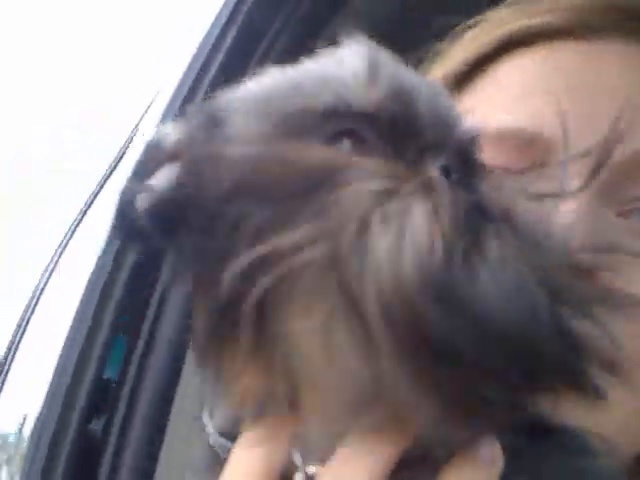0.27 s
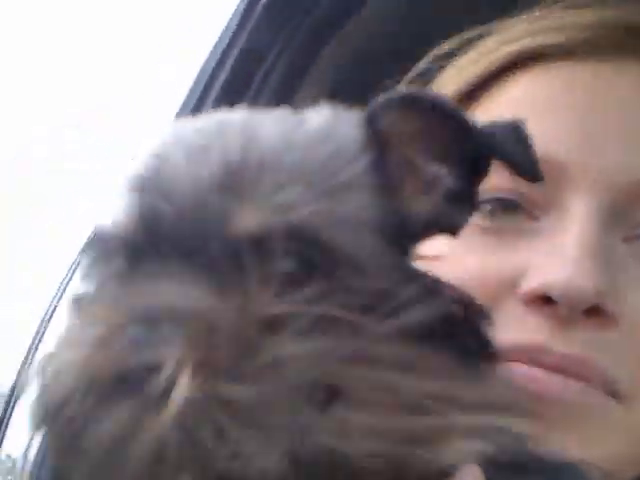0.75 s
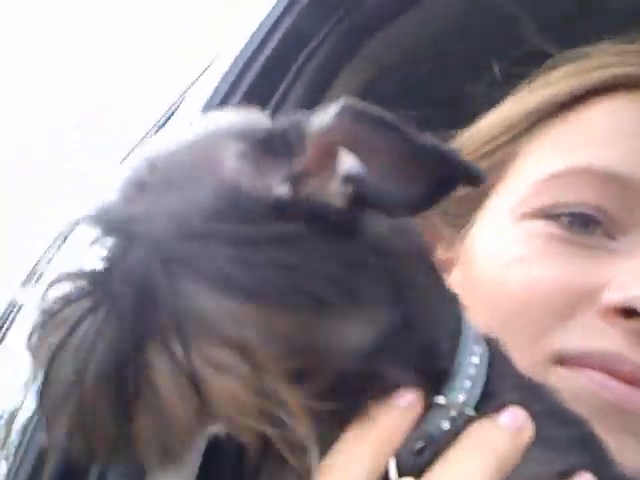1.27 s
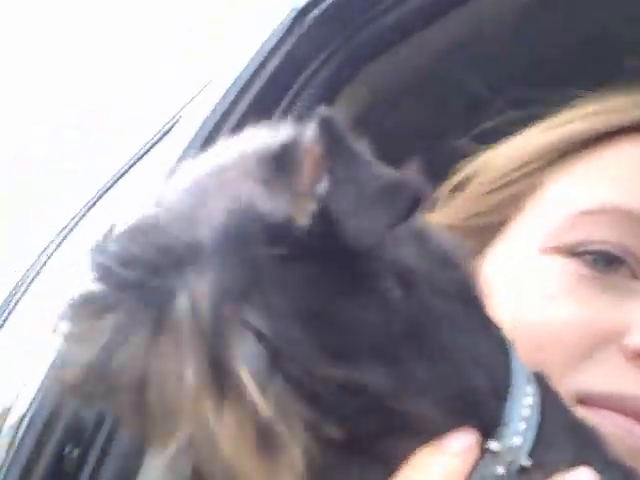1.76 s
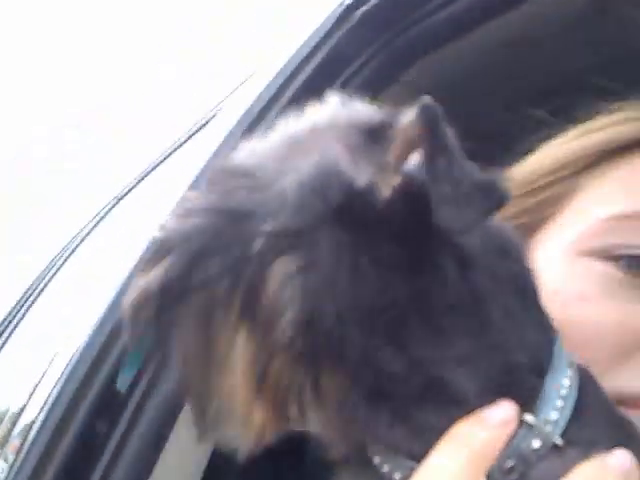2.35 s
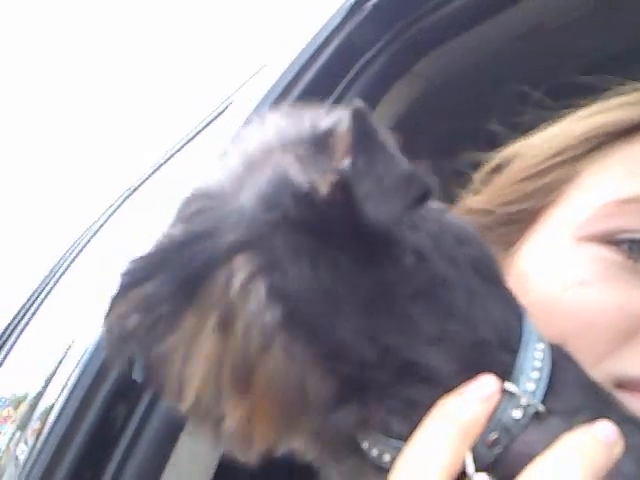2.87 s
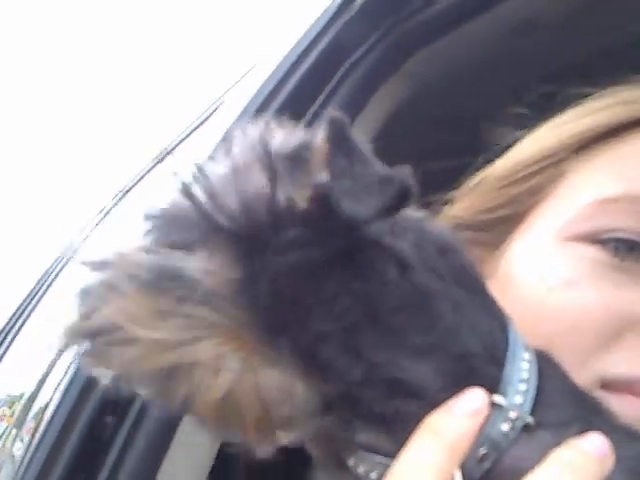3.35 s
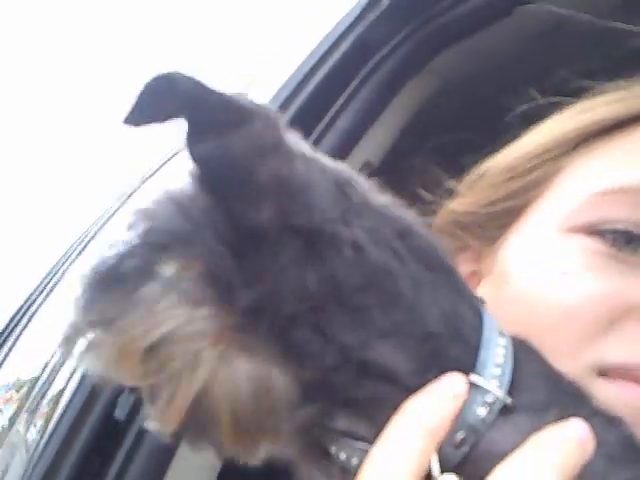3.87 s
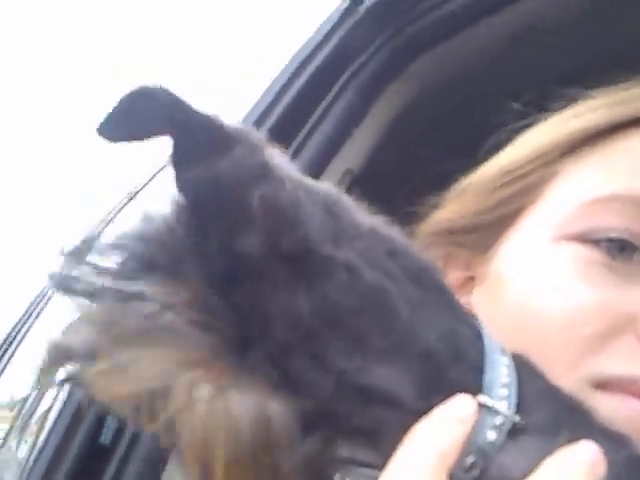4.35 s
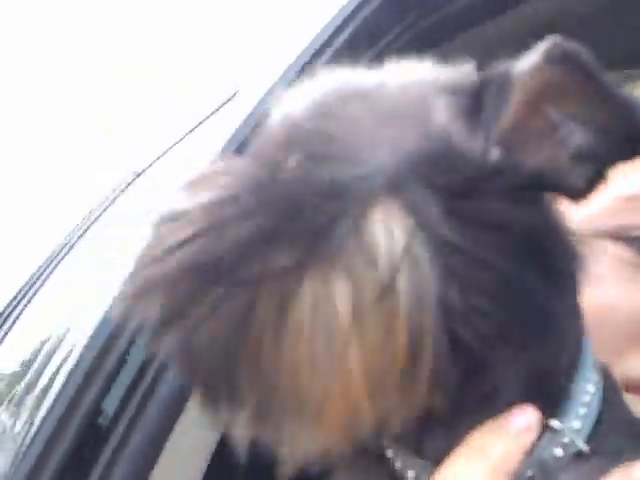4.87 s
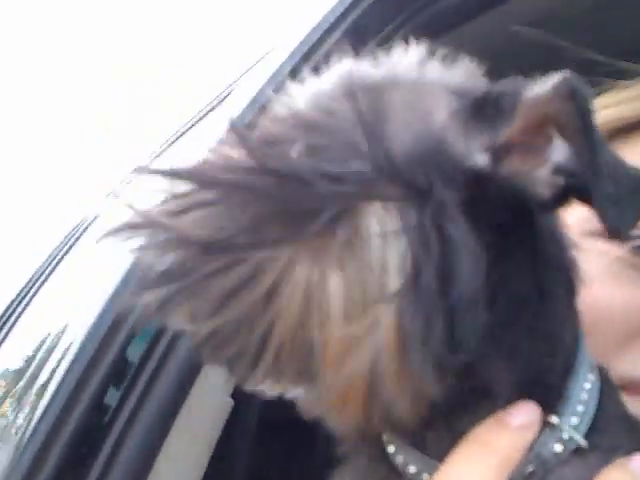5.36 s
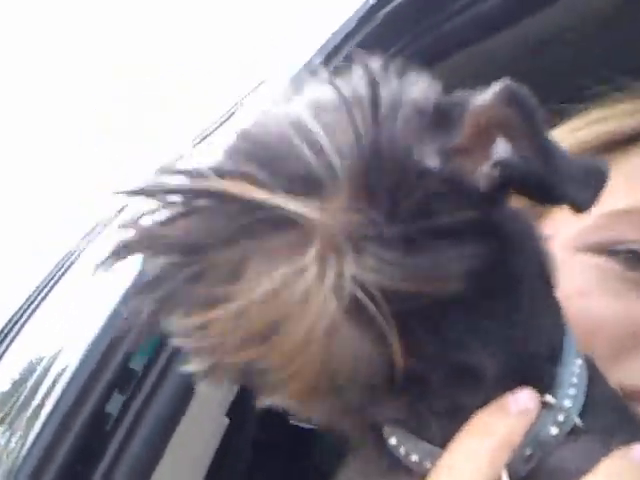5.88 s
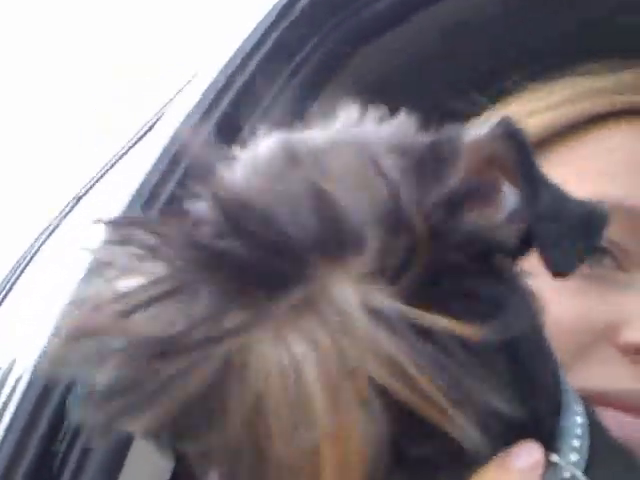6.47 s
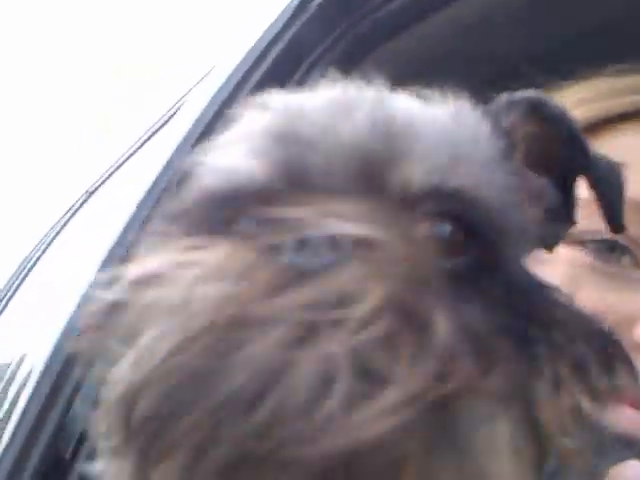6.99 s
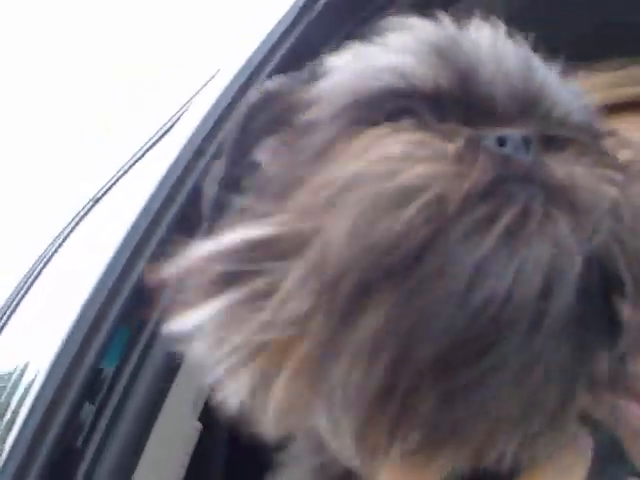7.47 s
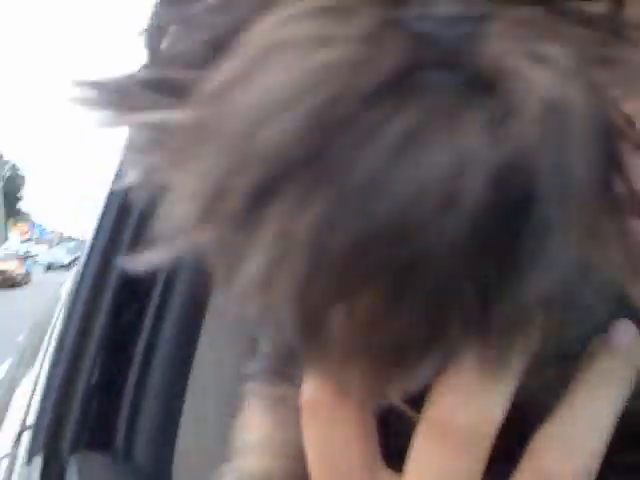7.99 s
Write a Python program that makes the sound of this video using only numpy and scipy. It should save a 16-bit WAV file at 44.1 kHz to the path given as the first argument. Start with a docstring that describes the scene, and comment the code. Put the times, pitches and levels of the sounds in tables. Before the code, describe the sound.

A small microphone sits right by the open window of a moving car. From 0 s, strong wind overloads it with deep uneven buffeting: low thuds, mid thumps, fluttering gusts and sharp slaps with short sprays of hiss. Behind is a steady cabin rush of tyre roar and passing air, with fine hiss and a very faint thin whistle high above. Between about 0.7 and 1.6 s a soft band of rush glides upward, perhaps passing traffic. Slaps crowd together around 2.3-2.6 s, the hardest near 2.5 s. From 3.6 s faint damped metallic engine ticks begin under the wind, roughly a dozen a second. After 4.5 s the wind and road rush ease, with a marked lull near 5.8 s and renewed thumps around 6 s. From 6.6 to 8.2 s only scattered weaker bumps remain, and the slightly slower ticks stand clear over softer rush; the whistle lifts slightly near 7.9 s.

```python
"""A small microphone is held by the open window of a car that slows down.
From the start eddies buffet and slap its port with lumpy low noise, tyre and air rush fill the cabin,
and a thin whistle of narrow resonant noise sits high above; about a second in, a band of rush sweeps upward.
From 3.6 s the engine ticks faintly, damped metal set ringing by rattling contacts; the ticks come
slower and clearer as the wind eases and the car loses speed."""
import sys
import numpy as np
from scipy import signal
from scipy.fft import rfft, irfft, next_fast_len
from scipy.io import wavfile
from scipy.ndimage import uniform_filter1d

SR = 44100
rng = np.random.default_rng(int(sys.argv[2]) if len(sys.argv) > 2 else 0)


def transcribe(u):
    """Save the signal u as a 16-bit wav file named by the first command-line argument.

    u: samples, shape (n,) or (channels, n), limited to [-1, 1]; the rate is SR.
    q: integer samples, one column per channel.
    """
    v = np.clip(np.atleast_2d(u).T, -1, 1)
    q = np.round(v * 32767).astype(np.int16)
    wavfile.write(sys.argv[1], SR, q)


N = 362941  # samples

# Spectrum shapes below are relative: each noise is scaled to unit rms before its level is set.
# large eddies at the port: (frequency [Hz], density [dB per Hz])
LARGE_EDDIES = [(12, -31), (22, -0.5), (40, 2), (60, -2), (90, -11.5), (200, -47.5)]
# middling eddies at the port: (frequency [Hz], density [dB per Hz])
MIDDLING_EDDIES = [(40, -18.5), (72, 2), (110, -1), (150, -5.5), (220, -27), (400, -54)]
# small eddies at the port: (frequency [Hz], density [dB per Hz])
SMALL_EDDIES = [(90, -16), (170, -1.5), (250, -4), (400, -10), (600, -16.5), (1200, -25), (3000, -49.5),
                (6000, -86.5)]
# wind on the port between buffets:
# (time [s], large eddies [dB], middling eddies [dB], small eddies [dB])
WIND = [(0, -23, -27, -31), (.3, -24, -27, -31), (.62, -28, -28, -33), (1.15, -28.5, -30.5, -35),
        (1.45, -25, -30.5, -34), (1.72, -23, -29, -35), (1.83, -29, -34, -39), (1.95, -24, -30, -35),
        (2.3, -22.5, -27.5, -31), (2.58, -24, -28, -32), (2.66, -31, -33, -37), (2.77, -28, -33, -36),
        (2.86, -23.5, -33, -37), (3.1, -23, -25, -32.5), (3.6, -24, -27, -33.5), (4.45, -27, -32, -37.5),
        (4.7, -26, -29, -37), (5.3, -27.5, -30, -36), (5.48, -30.5, -31.5, -40), (5.7, -31, -35, -42),
        (5.79, -38, -43, -44), (5.93, -37, -41, -43), (6.0, -28, -31, -40), (6.25, -28, -31, -40),
        (6.7, -32, -38, -41.5), (7.2, -37, -44.5, -46), (7.7, -35.5, -42.5, -44.5), (8.05, -37, -45, -46),
        (8.23, -40, -50, -46.5)]
# buffets, swells of the wind:
# (start [s], length [s], large eddies [dB], middling eddies [dB], small eddies [dB])
BUFFETS = [(0.046, 0.065, -14.5, -30, -25.5), (0.137, 0.077, -25, -23.5, -43), (0.268, 0.07, -18, -25, -27),
           (0.352, 0.085, -18, -20.5, -29), (0.473, 0.1, -18.5, -35.5, -33),
           (0.675, 0.034, -18, -16, -26.5), (0.755, 0.05, -15.5, -25, -44), (0.834, 0.016, -10, -18, -26),
           (1.009, 0.056, -18.5, -39, -31), (1.179, 0.025, -25, -21.5, -40),
           (1.299, 0.076, -20.5, -20, -27), (1.466, 0.082, -18, -16.5, -28), (1.552, 0.096, -14, -25, -26),
           (1.638, 0.066, -17.5, -23.5, -32), (1.758, 0.042, -22, -24, -38),
           (1.862, 0.047, -14.5, -23.5, -28.5), (1.925, 0.091, -28, -25, -28.5),
           (2.028, 0.097, -21, -21.5, -27), (2.213, 0.069, -14.5, -35.5, -32.5),
           (2.26, 0.11, -18.5, -41, -25.5), (2.354, 0.077, -17, -35, -30.5),
           (2.469, 0.048, -27.5, -22, -25.5), (2.529, 0.034, -12, -21, -28.5),
           (2.568, 0.033, -18, -20, -29), (2.724, 0.042, -16, -20, -37), (2.92, 0.082, -15, -22, -29),
           (3.046, 0.049, -27, -24, -41), (3.203, 0.042, -17, -27, -28), (3.258, 0.08, -19.5, -22.5, -30),
           (3.373, 0.026, -27, -19, -48), (3.497, 0.031, -19, -28, -39), (3.602, 0.047, -20, -21, -35),
           (3.772, 0.055, -18.5, -35, -30), (3.969, 0.07, -21.5, -25, -30), (4.064, 0.05, -16, -39, -31.5),
           (4.156, 0.099, -22, -30.5, -38), (4.289, 0.086, -24.5, -27.5, -43),
           (4.504, 0.028, -21, -18.5, -46), (4.63, 0.11, -21.5, -32, -38), (4.804, 0.054, -24.5, -33, -37),
           (4.925, 0.063, -27, -18, -37), (5.07, 0.094, -23.5, -36, -38.5), (5.254, 0.037, -23, -29, -31),
           (5.29, 0.052, -20.5, -24, -31), (5.514, 0.025, -16.5, -19, -31.5), (5.612, 0.064, -22, -35, -42),
           (5.839, 0.053, -29.5, -33, -44), (5.957, 0.032, -22.5, -33, -37),
           (6.018, 0.041, -23, -20.5, -35), (6.065, 0.085, -20.5, -26.5, -39.5),
           (6.21, 0.07, -30, -28, -37.5), (6.298, 0.035, -23, -34, -45), (6.375, 0.023, -21, -33, -32.5),
           (6.48, 0.16, -32, -52, -41), (6.685, 0.057, -26, -40, -52), (6.772, 0.13, -32, -35.5, -46),
           (6.949, 0.06, -19, -33.5, -34), (7.006, 0.11, -37, -31.5, -51), (7.286, 0.062, -23, -57, -55),
           (7.626, 0.029, -23.5, -42, -35.5), (7.82, 0.11, -28.5, -38, -41.5)]
BUFFET_RISE_S, BUFFET_FADE_S = 0.041, 0.054  # a buffet swells quickly and fades more slowly

# level of the cabin body in the road and air rush: (time [s], level [dB])
RUSH_LEVEL = [(0.03, -34), (.4, -33), (.87, -34.5), (1.63, -34), (2.0, -35.5), (2.31, -36), (2.7, -36.5),
              (3.6, -37.5), (4.5, -39), (4.7, -40), (5.7, -41.5), (6.05, -40), (6.56, -43.5), (7.1, -44.5),
              (7.7, -41.5), (8.2, -42)]
# car speed shows in the mix, each level over the body:
# (time [s], treble [dB], air hiss [dB], tyre hum [dB])
SPEED_MIX = [(0, -16, -7.5, -2), (.8, -12.5, -10, -6), (2.2, -10, -8, -8.5), (3.3, -11, -11.5, -10),
             (4.5, -13, -15.5, -8.5), (6.0, -13, -16, -9), (7.1, -13, -23, -5.5), (8.2, -13, -14, -8)]
# tyre roar coloured by the cabin: (frequency [Hz], density [dB per Hz])
CABIN_BODY = [(60, -10), (200, -2.5), (450, -1), (700, -6.5), (900, -5.5), (1100, -2), (1500, -4),
              (1750, -8), (2000, -22.5), (2600, -38.5)]
# treble of the cabin rush: (frequency [Hz], density [dB per Hz])
CABIN_TREBLE = [(1700, -24.5), (2100, -5), (2350, 0.5), (2600, -1), (2800, -6), (3300, -9), (3900, -15.5),
                (4500, -31), (5600, -33), (6500, -37), (8000, -45.5), (9500, -57.5), (13000, -68.5)]
# smooth hiss of passing air: (frequency [Hz], density [dB per Hz])
AIR_HISS = [(1200, -17.5), (1600, -2.5), (2000, -0.5), (2400, -7), (3500, -22.5), (5000, -32),
            (7500, -56.5)]
# hum band of the tyres: (frequency [Hz], density [dB per Hz])
TYRE_HUM = [(740, -12.5), (820, -3.5), (900, -1), (980, -5.5), (1100, -25)]

# fine hiss of air sheared at the window edge: (frequency [Hz], density [dB per Hz])
TOP_HISS = [(4000, -18.5), (4800, 3), (6000, -1.5), (7000, -11.5), (8500, -24), (10500, -32.5)]
# level of the top hiss, strongest early at full speed: (time [s], level [dB])
TOP_HISS_LEVEL = [(0, -69), (.4, -69.5), (.8, -70.5), (1.5, -73.5), (2.2, -76), (2.7, -81.5), (3.6, -80.5),
                  (6.2, -87), (8.2, -82)]

# mean level of the high whistle: (time [s], level [dB])
WHISTLE_LEVEL = [(0, -84), (3.4, -88.5), (4.8, -92), (6.0, -94.5), (6.95, -92), (7.1, -88), (7.35, -86),
                 (7.75, -86), (7.86, -81), (7.96, -83), (8.03, -88), (8.2, -83)]
WHISTLE_HZ, WHISTLE_WIDTH_HZ = 6950, 240  # width of one pass through the resonance

# broad roar of strong buffets: (frequency [Hz], density [dB per Hz])
GUST_ROAR = [(350, -9.5), (600, -2), (1200, -2), (2500, -9), (4000, -24), (6000, -43), (9500, -66.5)]
# roar level when the small eddies of a buffet reach the given level; dB of roar for each dB more
ROAR_DB, ROAR_AT_DB, ROAR_GROWTH = -40.5, -28.5, 1.2

# sharp eddies slapping the port; the last column is a reference for both spray and crack:
# (time [s], thud peak before its low-pass [dB], treble reference [dB])
SLAPS = [(0.062, -8, -48), (0.284, -21, -51), (0.456, -8.5, -49), (0.508, -7.5, -60), (0.779, -16, -64),
         (0.9, -12, -63), (1.359, -18, -58), (1.439, -10.5, -72), (1.527, -28, -51), (1.598, -29, -56),
         (1.868, -11, -52), (2.019, -10.5, -57), (2.254, -19, -52), (2.268, -24, -55), (2.282, -18, -48.5),
         (2.297, -20, -49), (2.323, -10, -55), (2.357, -8.5, -51), (2.383, -20.5, -54), (2.474, -4, -52),
         (2.485, -11, -67), (2.499, -13, -61), (2.532, -2.5, -41), (2.567, -14.5, -54), (2.745, -17, -62),
         (2.95, -16, -61), (3.074, -17, -53), (3.302, -10, -53), (3.345, -22, -52), (3.374, -22, -60),
         (3.4, -26, -65), (3.753, -10.5, -69.5), (3.987, -13.5, -54), (4.095, -29, -58), (4.291, -9.5, -56),
         (4.598, -11, -64), (4.944, -17, -62), (5.07, -11, -71), (5.261, -21, -61), (5.309, -17, -57.5),
         (5.368, -11, -76), (5.513, -14, -59), (5.836, -19, -61), (5.965, -15.5, -64), (6.014, -19, -54),
         (6.199, -15, -61), (6.372, -19, -67), (6.679, -30, -64), (6.944, -19, -71), (7.023, -18, -72),
         (7.627, -27, -68), (7.861, -19, -58)]
# low thud of a slap: (frequency [Hz], density [dB per Hz])
SLAP_THUD = [(40, -21.5), (100, 0.5), (200, -8), (450, -23), (1000, -38.5), (2000, -48.5)]
# hissing spray of a slap: (frequency [Hz], density [dB per Hz])
SLAP_SPRAY = [(500, 17), (1500, 19.5), (3500, 5.5), (5000, -6), (7000, -26.5), (9000, -43.5)]

# a band of rush sweeps upward, perhaps passing traffic: (time [s], centre [Hz], level [dB])
SWEEP = [(.7, 1270, -54), (.95, 1397, -43.5), (1.2, 1523, -43.5), (1.4, 1685, -49), (1.6, 1720, -63)]
SWEEP_WIDTH_HZ = 190

# engine running down, one tick a turn: (time [s], turns so far [count])
TURNS = [(3.645, 0), (4.395, 10), (4.86, 16), (5.41, 23), (5.9, 29), (6.152, 32), (6.589, 37), (7.025, 42),
         (7.468, 47), (7.915, 52), (8.19, 55)]
# tick strength before the softening filter: (time [s], bright peak [dB], dull knock peak [dB])
TICK_LEVEL = [(3.65, -69.5, -36), (4.5, -64.5, -40.5), (5.3, -74, -41), (6.099, -61.5, -38),
              (6.4, -72, -52.5), (7.0, -63, -44), (8.2, -58.5, -40)]
# ticks that stand clear once the wind has eased, before the softening filter:
# (time [s], bright peak [dB], dull knock peak [dB])
CLEAR_TICKS = [(6.592, -63, -44), (6.68, -65, -43), (6.76, -67, -42), (6.848, -60, -41), (6.939, -63, -43),
               (7.024, -66, -44), (7.117, -66, -52), (7.203, -66, -44), (7.292, -60, -45),
               (7.382, -66, -43), (7.471, -61, -36), (7.566, -61, -40), (7.652, -63, -56),
               (7.741, -60, -41), (7.828, -60, -37), (7.919, -58, -41), (8.011, -60, -39),
               (8.103, -60, -42), (8.192, -57, -36.5)]
# metal modes of the dull knock, relative levels: (frequency [Hz], level [dB], 60 dB decay [s])
TICK_DULL = [(2486, 2, 0.0072), (2950, -2.5, 0.0036), (3500, -14.5, 0.0036)]
# metal modes of the bright tick, relative levels: (frequency [Hz], level [dB], 60 dB decay [s])
TICK_BRIGHT = [(4700, -4, 0.003), (5200, -1, 0.004), (5600, -1, 0.004), (6200, -6, 0.003)]
TICK_SPREAD_DB, TICK_JITTER_S = 1.6, 0.002  # standard deviations from tick to tick
RATTLE_UNDER_TICKS_DB = -8  # a steady rattle fills the gaps between ticks

CUTOFF_HZ = 12400  # stop-band edge of the microphone


def from_db(db):
    """Decibels to gain."""
    return 10 ** (np.asarray(db) / 20)


def rms_one(x):
    """Scale to unit rms."""
    return x / np.sqrt(np.mean(x ** 2) + 1e-20)


def in_time(rows):
    """Table columns as curves, one value a sample, held flat beyond the ends."""
    s, *columns = np.transpose(rows)
    t = np.arange(N) / SR
    return [np.interp(t, s, column) for column in columns]


def drift(rate_hz):
    """Slow chance: noise at every 40th sample through a double one-pole low-pass, at unit rms."""
    r = np.exp(-80 * np.pi * rate_hz / SR)
    coarse = rng.standard_normal(N // 40 + 2002)
    slow = signal.lfilter([1], [1, -2 * r, r * r], coarse)[2000:]  # skip the filter's settling
    return np.interp(np.arange(N) / 40, np.arange(len(slow)), rms_one(slow))


def turbulence(spectrum, lump_db, lump_hz, own_db):
    """Coloured noise in overlapping octave bands; lumps swell all bands, each band also flickers alone."""
    size = next_fast_len(N)
    hz = np.arange(1, size // 2 + 2) * SR / size
    point_hz, point_db = np.transpose(spectrum)
    colour_db = np.interp(np.log(hz), np.log(point_hz), point_db, left=-150, right=-150)
    noise = from_db(colour_db) * rfft(rng.standard_normal(size))
    lumps = lump_db * drift(lump_hz)
    lowest, highest = int(np.log2(point_hz[0])), int(np.log2(point_hz[-1])) + 1
    out = 0
    for octave in range(lowest, highest + 1):
        window = np.cos(np.pi / 2 * np.clip(np.log2(hz) - octave, -1, 1)) ** 2
        band = irfft(noise * window, size)[:N]
        out = out + from_db(lumps + own_db * drift(lump_hz)) * band
    return rms_one(out)


def evened(x, evenness, span_s):
    """Eddies follow one another at a fairly even strength: swings slower than the span are flattened."""
    span = max(round(span_s * SR), 1)
    power = uniform_filter1d(uniform_filter1d(x ** 2, span), span)
    strength = np.sqrt(np.abs(power) + 0.018)  # the floor spares the quietest moments
    return rms_one(x / strength ** evenness)


def bursts(times, levels_db, rise_s, fall_s):
    """An envelope with one quick rise and exponential fall for each event."""
    marks = np.zeros(N)
    marks[np.round(np.asarray(times) * SR).astype(int)] = from_db(levels_db)
    t = np.arange(SR // 10) / SR
    shape = (1 - np.exp(-t / rise_s)) ** 2 * np.exp(-t / fall_s)
    return signal.fftconvolve(marks, shape / shape.max())[:N]


def buffets(levels_db):
    """Envelope of the buffets: each holds for its length with soft edges, the strongest winning."""
    start, length = np.transpose(BUFFETS)[:2]
    t, out = np.arange(N) / SR, np.zeros(N)
    for s, d, gain in zip(start, length, from_db(levels_db)):
        rise, fade = (t - s) / BUFFET_RISE_S, (s + d - t) / BUFFET_FADE_S
        inside = np.clip(np.minimum(rise, fade) + 0.5, 0, 1)
        out = np.maximum(out, gain * np.sin(np.pi / 2 * inside) ** 2)
    return out


def buffeting():
    """Large eddies thud at the port, middling ones thump, small ones flutter on top."""
    large = turbulence(LARGE_EDDIES, lump_db=-1.5, lump_hz=12.0, own_db=1.9)
    middling = turbulence(MIDDLING_EDDIES, lump_db=3.5, lump_hz=22.0, own_db=1.5)
    small = turbulence(SMALL_EDDIES, lump_db=2.5, lump_hz=23.0, own_db=0.5)
    eddies = (evened(large, evenness=0.64, span_s=0.034),
              evened(middling, evenness=0.74, span_s=0.058),
              evened(small, evenness=0.54, span_s=0.037))
    out = 0
    for wind_db, buffet_db, noise in zip(in_time(WIND), np.transpose(BUFFETS)[2:], eddies):
        out = out + np.hypot(from_db(wind_db), buffets(buffet_db)) * noise  # powers add
    return out


def rush():
    """Tyre roar coloured by the cabin; at speed a smooth air hiss fills the dip between its resonances."""
    level_db, = in_time(RUSH_LEVEL)
    treble_db, hiss_db, hum_db = in_time(SPEED_MIX)
    body = turbulence(CABIN_BODY, lump_db=0.86, lump_hz=19.0, own_db=-0.46)
    treble = turbulence(CABIN_TREBLE, lump_db=1.5, lump_hz=6.5, own_db=-0.9)
    hiss = turbulence(AIR_HISS, lump_db=1.0, lump_hz=5.5, own_db=1.0)
    hum = turbulence(TYRE_HUM, lump_db=1.0, lump_hz=19.0, own_db=0.5)
    flutter_db = 0.48 * drift(28.0)  # the open window lets the whole rush swell together
    layers = body + from_db(treble_db) * treble + from_db(hiss_db) * hiss + from_db(hum_db) * hum
    return from_db(level_db + flutter_db) * layers


def top_hiss():
    """Fine hiss of air sheared at the window edge."""
    level_db, = in_time(TOP_HISS_LEVEL)
    return from_db(level_db) * turbulence(TOP_HISS, lump_db=1.5, lump_hz=10.0, own_db=1.5)


def whistle():
    """Noise twice through one narrow resonance, wavering in level."""
    b, a = signal.iirpeak(WHISTLE_HZ, WHISTLE_HZ / WHISTLE_WIDTH_HZ, fs=SR)
    once = signal.lfilter(b, a, rng.standard_normal(N))
    tone = rms_one(signal.lfilter(b, a, once))
    level_db, = in_time(WHISTLE_LEVEL)
    return from_db(level_db + 1.5 * drift(25.0)) * tone


def roar():
    """Strong buffets tear past the port with a broad roar that grows faster than they do."""
    small_db = np.transpose(BUFFETS)[4]
    small = buffets(small_db) / from_db(ROAR_AT_DB)
    noise = turbulence(GUST_ROAR, lump_db=1.8, lump_hz=30.0, own_db=0.6)
    return from_db(ROAR_DB) * small ** ROAR_GROWTH * noise


def slaps(crest_db=9.5, spray_over_treble_db=12.0, crack_over_treble_db=41.0, crack_late_s=0.006):
    """A sharp eddy gives a short thud and a spray of hiss, with one filtered click as a crack at its crest."""
    s, peak_db, treble_db = np.transpose(SLAPS)
    thud_noise = turbulence(SLAP_THUD, lump_db=2.0, lump_hz=88.0, own_db=2.5)
    thud = bursts(s, peak_db - crest_db, rise_s=0.0033, fall_s=0.0067)
    thud = thud * evened(thud_noise, evenness=1.0, span_s=0.006)
    thud = signal.sosfilt(signal.butter(2, 2500, fs=SR, output="sos"), thud)

    # the spray lies mostly below the treble, so its whole level is higher than the treble reference
    spray_noise = turbulence(SLAP_SPRAY, lump_db=1.0, lump_hz=120.0, own_db=2.5)
    spray = bursts(s, treble_db + spray_over_treble_db, rise_s=0.002, fall_s=0.007)
    spray = spray * evened(spray_noise, evenness=0.65, span_s=0.0037)

    clicks = np.zeros(N)
    at = ((s + crack_late_s) * SR).astype(int)
    clicks[at] = from_db(treble_db + crack_over_treble_db) * rng.choice([-1, 1], len(s))
    crack_band = signal.butter(2, [500, 1800], "band", fs=SR, output="sos")
    crack = signal.sosfilt(crack_band, clicks + 1e-18)  # tiny offset keeps the filter fast
    crack = signal.sosfilt(signal.butter(4, 3500, fs=SR, output="sos"), crack)  # soft edge
    return thud + spray + crack


def sweep():
    """Low-passed noise carried on a gliding centre frequency."""
    centre_hz, level_db = in_time(SWEEP)
    low_pass = signal.butter(2, SWEEP_WIDTH_HZ / 2, fs=SR, output="sos")
    slow = signal.sosfilt(low_pass, rng.standard_normal((2, N)))
    phase = 2 * np.pi * np.cumsum(centre_hz) / SR
    return from_db(level_db) * rms_one(slow[0] * np.cos(phase) + slow[1] * np.sin(phase))


def ring(contacts, modes):
    """Contacts set each damped mode of the metal ringing."""
    out = 0
    for hz, db, t60 in modes:
        r, w = from_db(-60 / (t60 * SR)), 2 * np.pi * hz / SR
        mode = signal.lfilter([0, np.sin(w)], [1, -2 * r * np.cos(w), r * r], contacts + 1e-18)
        out = out + from_db(db) * mode
    return out


def engine_ticks(crest_db=8.0, echo_db=-5.5, half_turn_s=0.041):
    """Each tick is a short rattle of contacts into well damped metal; a duller knock recurs half a turn later."""
    when, turns = np.transpose(TURNS)
    chance = rng.standard_normal((int(turns[-1]) + 1, 3))
    s = np.interp(np.arange(len(chance)), turns, when) + TICK_JITTER_S * chance[:, 0]
    at, bright_db, dull_db = np.transpose(TICK_LEVEL)
    bright_db = np.interp(s, at, bright_db) + TICK_SPREAD_DB * chance[:, 1]
    dull_db = np.interp(s, at, dull_db) + TICK_SPREAD_DB * chance[:, 2]
    later_db = dull_db + echo_db
    for clear in CLEAR_TICKS:  # each takes the place of the nearest tick
        k = np.argmin(np.abs(s - clear[0]))
        s[k], bright_db[k], dull_db[k] = clear

    halfway = np.minimum(s + half_turn_s, (N - 1) / SR)
    knock_db = np.r_[dull_db, later_db] - crest_db
    knocks = bursts(np.r_[s, halfway], knock_db, rise_s=0.006, fall_s=0.008)
    ticks = bursts(s, bright_db - crest_db, rise_s=0.004, fall_s=0.009)
    running = np.clip(np.arange(N) / SR - when[0], 0, 1)  # masked until the wind eases: 1 s fade-in
    rattle_db = in_time(TICK_LEVEL)[0] - crest_db + RATTLE_UNDER_TICKS_DB
    rattle = running * from_db(rattle_db)

    contacts = from_db(1.2 * drift(90.0)) * rng.standard_normal((2, N))  # uneven rattle
    dull = ring(ring(contacts[0], [(2670, 0, 0.0012)]), TICK_DULL)
    dull = evened(rms_one(dull), evenness=0.6, span_s=0.004)
    bright = evened(rms_one(ring(contacts[1], TICK_BRIGHT)), evenness=0.6, span_s=0.004)
    soften = signal.butter(3, [2000, 6800], "band", fs=SR, output="sos")
    return signal.sosfilt(soften, knocks * dull + np.hypot(ticks, rattle) * bright)


def scene():
    """All sources meet at one microphone by the open window."""
    wind = buffeting() + roar() + slaps()
    car = rush() + top_hiss() + whistle() + engine_ticks()
    return (wind + car + sweep())[None]


def record(dry):
    """The microphone rounds the peaks and cuts the top."""
    rounded = 0.91 * np.tanh(dry / 0.9)
    return signal.sosfilt(signal.cheby2(12, 70, CUTOFF_HZ, fs=SR, output="sos"), rounded)


dry = scene()
out = record(dry)
transcribe(out)
```